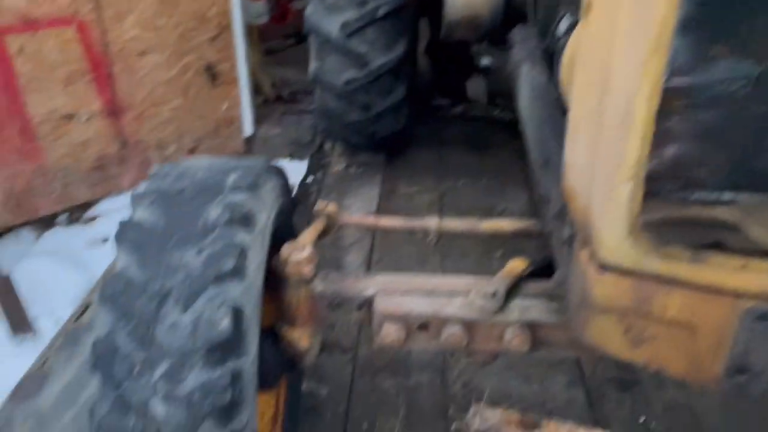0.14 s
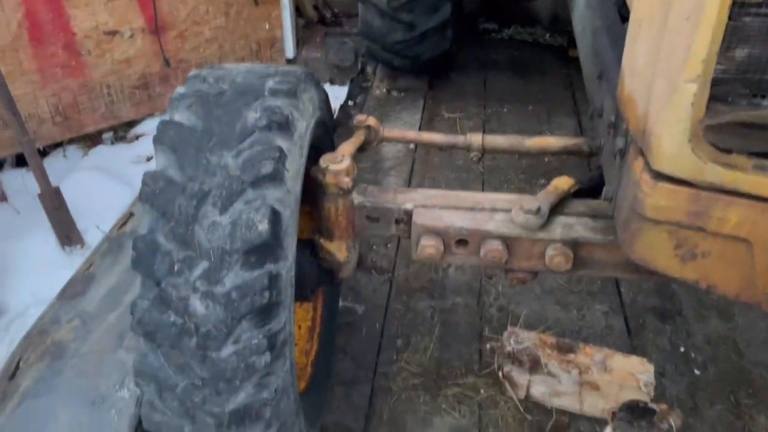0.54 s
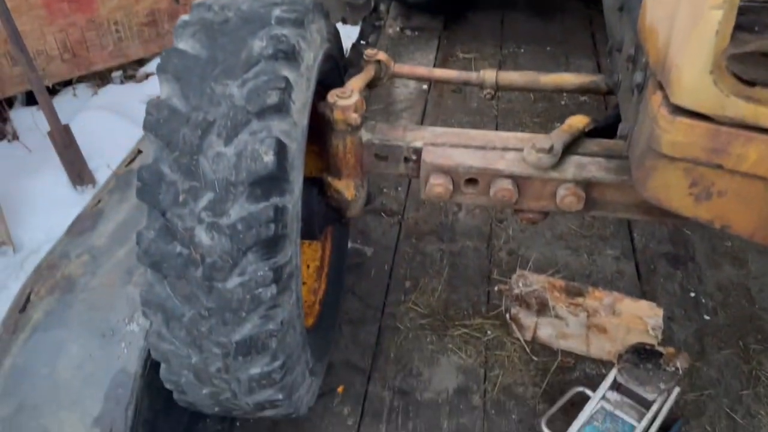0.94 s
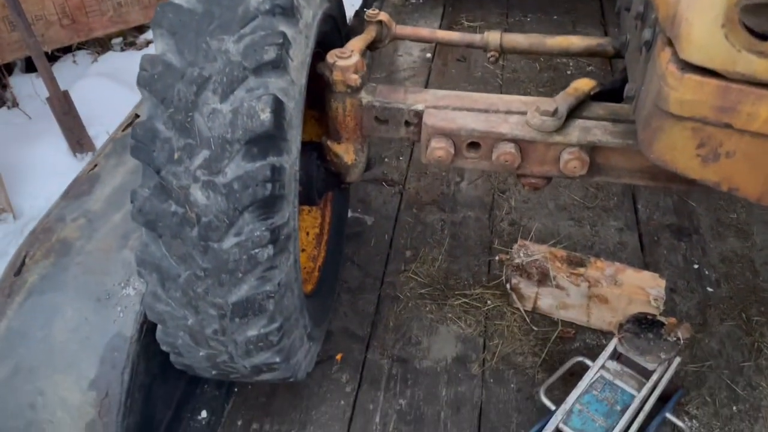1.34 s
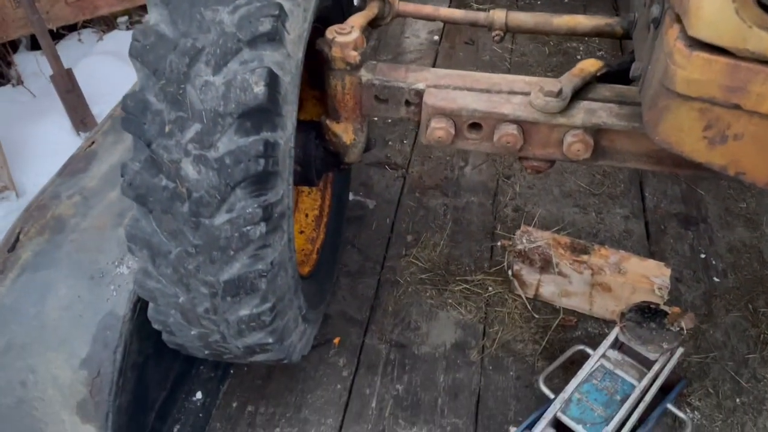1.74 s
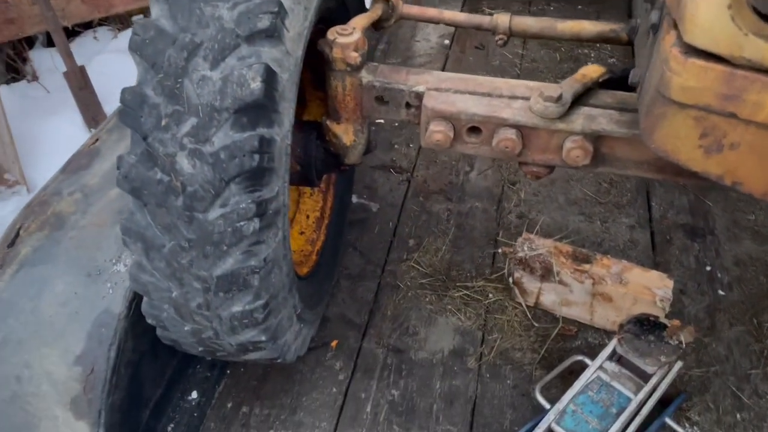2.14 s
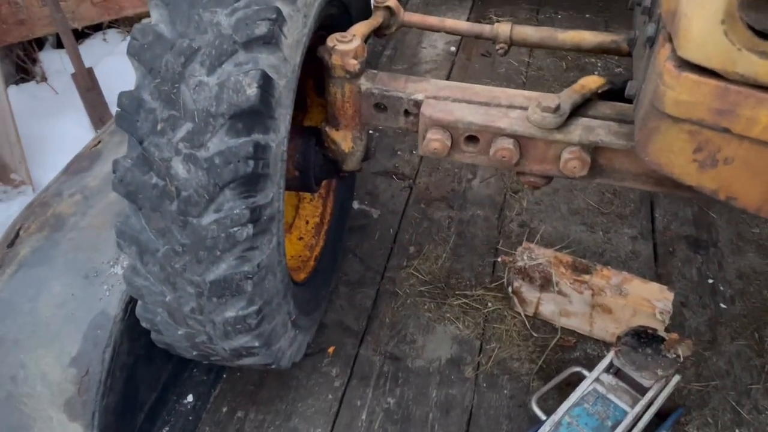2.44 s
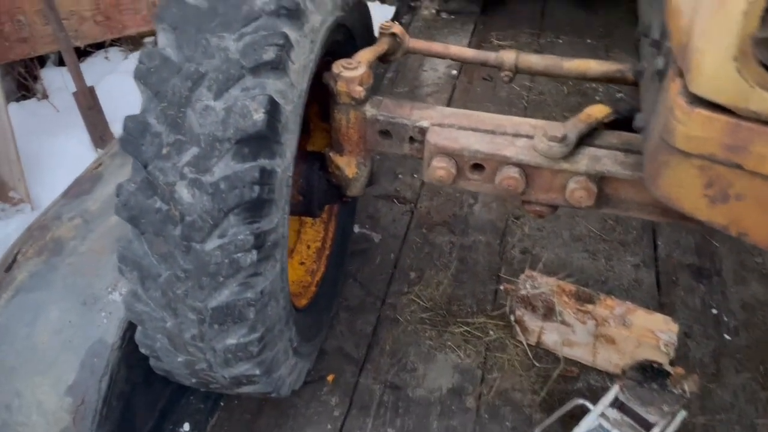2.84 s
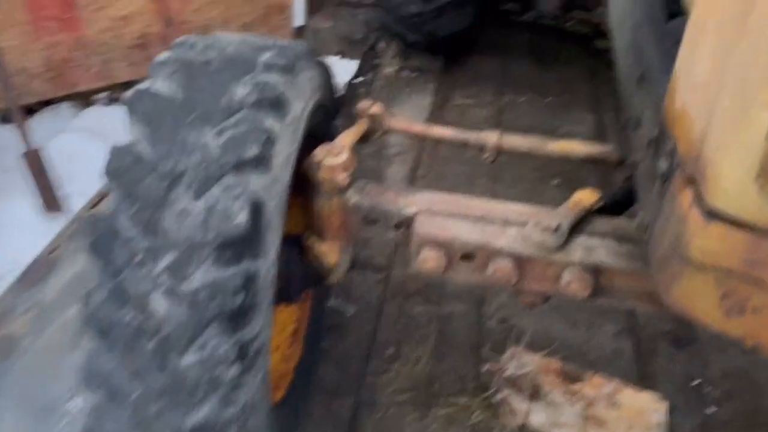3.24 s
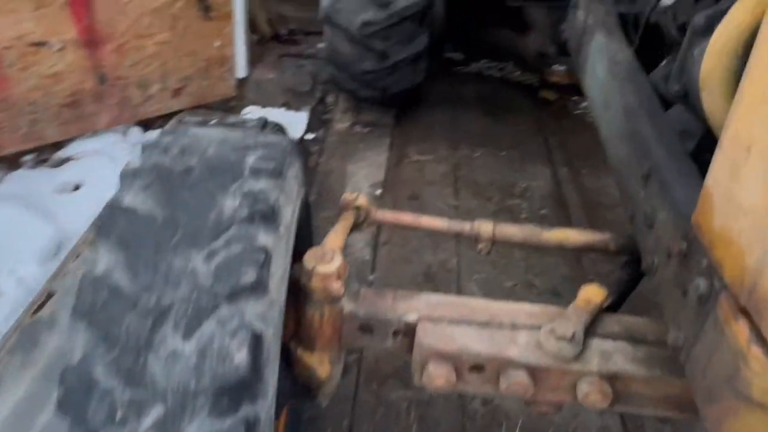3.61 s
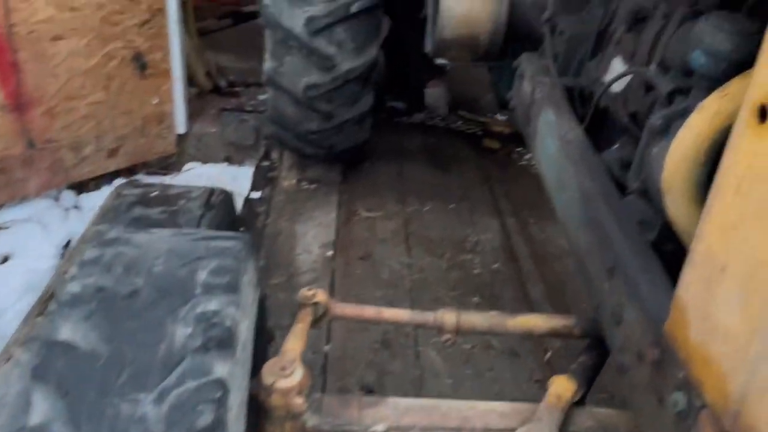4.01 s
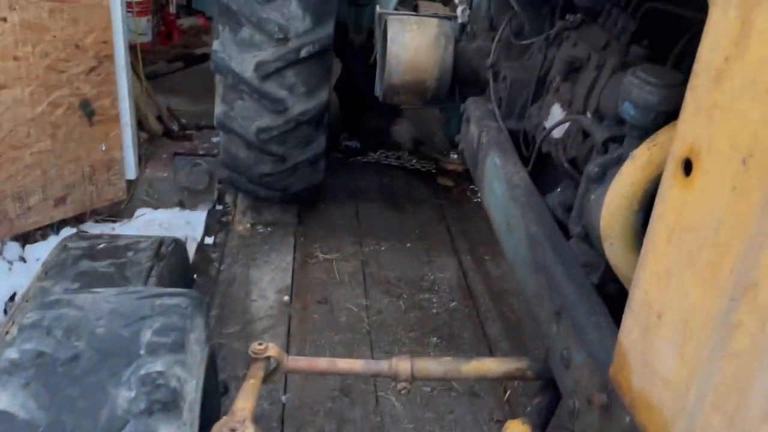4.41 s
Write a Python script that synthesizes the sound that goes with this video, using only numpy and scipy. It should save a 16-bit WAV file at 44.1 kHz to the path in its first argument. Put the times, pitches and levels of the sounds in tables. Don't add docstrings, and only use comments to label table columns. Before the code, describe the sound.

A lever chain hoist under load ratchets in rapid, bright steel clicks with duller knocks, after an opening buffet of wind on the microphone.

```python
import sys
import numpy as np
from scipy import signal
from scipy.fft import rfft, irfft
from scipy.io import wavfile
from scipy.ndimage import uniform_filter1d

SR = 44100
rng = np.random.default_rng(int(sys.argv[2]) if len(sys.argv) > 2 else 0)


def voltage_ratio(level):
    return 10 ** (np.asarray(level, float) / 20)


def unload_audio(sound):
    columns = np.transpose(np.atleast_2d(sound))
    steps = np.round(np.clip(columns, -1, 1) * 32767)
    wavfile.write(sys.argv[1], SR, steps.astype(np.int16))


N = 201316

# time [s], level [dB].
GUST = [(0.0, -37), (0.06, -11.5), (0.1, -21), (0.41, -29.5), (0.51, -23), (0.62, -46.5), (0.75, -32.5),
        (1.07, -50), (1.13, -42.5), (1.8, -50.5), (1.84, -39.5), (2.48, -34.5), (2.73, -42), (2.77, -36),
        (4.3, -41.5), (4.33, -32.5), (4.51, -46.5), (4.56, -22)]
# frequency [Hz], level [dB per Hz].
BUFFET = [(25, -40), (40, -9), (60, -0.5), (110, -4), (200, -7), (400, -24), (800, -76)]
# frequency [Hz], level [dB per Hz].
FLUTTER = [(80, -30), (160, -13), (300, 2.5), (500, -6), (800, -12), (1300, -29.5), (2500, -50)]
# time [s], peak [dB], frequency [Hz].
EDDY_POPS = [(0.013, -5, 335), (0.029, -11, 337), (0.042, -4, 423), (0.059, -4, 97), (0.07, -14.5, 212),
             (0.208, -13, 92), (0.447, -17, 120), (0.647, -26.5, 95), (0.748, -24.5, 495), (0.745, -25, 73),
             (0.813, -25, 96.9), (1.124, -46, 72.7), (1.126, -23.5, 92), (1.22, -26.5, 86),
             (1.489, -27.5, 260), (1.639, -22.5, 330), (1.882, -33, 129), (2.085, -19.5, 136),
             (2.233, -23, 134), (2.436, -15, 210), (2.952, -17, 145), (3.304, -25, 93), (3.549, -36, 196),
             (3.819, -42, 494), (3.821, -21, 181), (4.018, -17.5, 474), (4.237, -27, 156),
             (4.32, -22.5, 73), (4.548, -15.5, 212)]
# frequency [Hz], level [dB per Hz].
AIR = [(180, -33), (300, 13.5), (787, -13), (1970, 0.5), (6620, -15), (8090, -8), (12300, -23.5),
       (16000, -57)]
# start [s], housing level [dB], loudest housing ring [Hz].
BACK = [(0.1157, -22, 2870), (0.169, -24.5, 2070), (0.2108, -23, 3030), (0.8718, -23.5, 1660),
        (0.9369, -27.5, 2620), (0.993, -26.5, 3640), (1.5927, -23, 2400), (1.6416, -23, 2400),
        (1.6964, -23, 2740), (2.2953, -24, 1580), (2.3426, -22, 1990), (2.383, -22, 3130),
        (3.012, -25, 3170), (3.0585, -22.5, 2070), (3.102, -22, 2590), (3.7218, -22.5, 2860),
        (3.77, -21, 1660), (3.8120, -18.5, 2730), (4.4277, -22, 2700), (4.4815, -17.5, 2670),
        (4.524, -14.5, 3470)]
# start [s], housing level [dB], snap level [dB].
TAKE_UP = [(0.3017, -24, -29), (0.377, -29.5, -39.5), (1.139, -41, -53), (1.161, -29, -39.5),
           (1.8464, -34, -40.5), (1.8594, -29.5, -37), (2.5614, -43, -43.5), (2.5696, -34.5, -39),
           (2.5774, -29, -35.5), (3.2472, -37, -51), (3.2761, -30.5, -55), (3.3117, -22, -33.5),
           (3.888, -46, -52), (3.947, -50, -65), (3.9574, -34.5, -66), (3.9659, -31.5, -58),
           (4.0061, -36.5, -42), (4.0137, -19.5, -31), (4.0211, -25.5, -34)]
# start [s], housing level [dB], loudest housing ring [Hz].
LIFT = [(0.4506, -28.5, 2860), (0.4933, -26.5, 2070), (0.5237, -25, 1440), (0.5487, -27.5, 3330),
        (0.577, -27, 2070), (1.228, -28.5, 2470), (1.262, -28, 2070), (1.292, -26.5, 1820),
        (1.3229, -29, 1690), (1.9195, -29, 3130), (1.9549, -27, 3270), (1.9884, -27, 2350),
        (2.018, -26.5, 2260), (2.6338, -28, 2140), (2.6743, -28.5, 2240), (2.7063, -27, 2280),
        (2.7374, -28, 2280), (3.3601, -22, 2020), (3.3954, -24.5, 3070), (3.4351, -22.5, 2140),
        (3.465, -24, 3160), (4.0676, -24, 2070), (4.1081, -21.5, 2850), (4.1435, -21.5, 2800),
        (4.1778, -21, 3410)]
# start [s], housing level [dB], loudest housing ring [Hz].
HOLD = [
    (0.624, -29.5, 3120),
    (1.3691, -26.5, 3280),
    (2.0605, -28, 2360),
    (2.7794, -29, 2100),
    (3.5032, -23.5, 3100),
    (4.2382, -25.5, 1870),
]
# start [s], housing level [dB].
SLACK = [(0.7575, -47), (0.7629, -28.5), (0.8095, -37), (1.483, -38), (1.4938, -29), (2.1803, -41.5),
         (2.2, -44), (2.269, -57), (2.917, -34.5), (2.9506, -40), (3.6134, -34.5), (3.6356, -33.5),
         (3.6532, -39), (4.3205, -33.5), (4.3644, -37.5), (4.401, -50)]
# start [s], peak [dB].
STOP_KNOCKS = [
    (0.45, -17),
    (0.762, -37),
    (1.162, -36.5),
    (2.581, -33),
    (3.309, -28.5),
    (4.018, -32),
]
# frequency [Hz], width [Hz], level [dB].
PAWL_MODES = [(4855, 590, 5), (5500, 700, 9.5), (6740, 520, 8.5), (7455, 380, 14), (8280, 1400, -1.5),
              (8870, 430, 15.5), (9440, 470, 2), (11460, 560, 6), (12040, 120, 8), (14200, 1300, -1.5),
              (14800, 510, -13)]
# frequency [Hz], width [Hz], level [dB].
HOUSING_MODES = [(1065, 345, -11), (1405, 81, 1.5), (1660, 27, -7), (2070, 132, 5), (2367, 210, -10),
                 (2615, 150, 3.5), (2863, 330, -3), (3420, 293, 0.5), (3526, 530, -2)]
# frequency [Hz], width [Hz], level [dB].
STOP_MODES = [(200, 140, 4), (323, 78, 1), (510, 450, -1), (716, 150, 2.5), (970, 60, -34)]
# frequency [Hz], width [Hz], level [dB].
FRAME_MODES = [(356, 93, 6), (410, 96, 3), (573, 230, -7), (712, 24, -2), (747, 190, -12)]
# frequency [Hz], time to fall 60 dB [s].
SHED_T60 = [(700, 0.4), (2000, 0.26), (5000, 0.29), (10000, 0.18), (16000, 0.19)]
# frequency [Hz], shared share [0 to 1].
LIKENESS = [(500, 0.72), (3000, 0.49), (6000, 0.58), (7700, 0.96), (8700, 0.87), (10000, 0.88), (11500, 1),
            (14500, 0.8)]
# frequency [Hz], left minus right level [dB].
LEFT_BIAS = [(60, 0.5), (130, -6), (290, 1.5), (640, 0.5), (1410, 2.5), (3100, 4.5), (6820, 0.5),
             (15000, -0.5)]
# frequency [Hz], phase [half turns].
RIGHT_LEAD = [(5500, 0), (7900, .98), (8600, 1.03), (11200, 2), (11800, 2.03), (14300, 2.98), (16000, 3.04)]


def rms_one(x):
    return x / np.sqrt(np.mean(x ** 2, axis=-1, keepdims=True) + 1e-20)


def at_hz(points, hz):
    table_hz, value = np.transpose(points)
    return np.interp(np.log(hz + 1), np.log(table_hz), value)


def band_pass(x, low_hz, high_hz):
    return signal.sosfilt(signal.butter(2, [low_hz, high_hz], "band", fs=SR, output="sos"), x)


def coloured(spectrum, channels):
    hz = np.fft.rfftfreq(N, 1 / SR)
    white = rng.standard_normal((channels, N))
    return rms_one(irfft(rfft(white) * voltage_ratio(at_hz(spectrum, hz)), N))


def drift(rate_hz):
    slow = signal.butter(2, rate_hz, fs=SR, output="sos")
    return rms_one(signal.sosfilt(slow, rng.standard_normal(N)))


def wind():
    t = np.arange(N) / SR
    lumps = np.clip(drift(27.8), -3, 1.3)
    gust_db = np.interp(t, *np.transpose(GUST))
    gust_flutter_db = -47.5 + 1.14 * (gust_db + 39.5)
    swing_db = -13 - 51 * t
    flutter_db = np.maximum(gust_flutter_db, swing_db)
    out = 0
    for spectrum, level_db, lumpy_db, side_db in ((BUFFET, gust_db - 1.5, 2.5, -13),
                                                  (FLUTTER, flutter_db - 7.5, 6.5, -9)):
        mid, side = coloured(spectrum, channels=2) * voltage_ratio(level_db + lumpy_db * lumps)
        out = out + mid + voltage_ratio(side_db) * side * np.array([[1], [-1]])
    return out


def eddy_pops():
    out = np.zeros(N)
    for s, peak_db, hz in EDDY_POPS:
        t = np.maximum(np.arange(N) / SR - s + 0.00296, 0)
        out += voltage_ratio(peak_db - 5.5) * np.sin(2 * np.pi * hz * t) * np.exp(-t * hz / 2.0)
    return band_pass(out, 45, 1100)


def still_air():
    return voltage_ratio(-52.5) * coloured(AIR, channels=2)


def contacts():
    link_ring_hz, take_up_rise_ms = 2400, 1.35
    rise_lost_per_db = 0.025
    rows = [(s, db, snap_db, take_up_rise_ms, link_ring_hz) for s, db, snap_db in TAKE_UP]
    slack = [(s, db, link_ring_hz) for s, db in SLACK]
    # table, base snap dB, share of the knock's excess passed to the snap, rise ms, brightening dB per s
    laws = ((LIFT, -21, 0.36, 1.25, 0),
            (HOLD, -22, 0.047, 2.4, 0),
            (slack, -33, 1, 2.4, 0),
            (BACK, -26.5, 0.2, 2.7, 1.08))
    for table, base_db, share, base_rise_ms, brightens in laws:
        for s, db, hz in table:
            snap_db = base_db + share * (db + 22.5) + brightens * (s - 2)
            rise_ms = base_rise_ms * np.exp(-rise_lost_per_db * (db + 25))
            rows.append((s, db, snap_db, rise_ms, hz))
    return np.transpose(sorted(rows))


def facing_crack_db(s):
    turn_s, turn_takes_s = 3.26, 0.15
    return 14 * np.clip((s - turn_s) / turn_takes_s, 0, 1)[:, None]


def strikes(times, levels_db, rise_ms, loudest_hz, modes, t60, crack_db, focus_db, rattle_db, broad_db):
    t = np.arange(4000) / SR
    draw = rng.standard_normal((len(times), 3, len(t)))
    rise = np.maximum(rise_ms, 0.1)[:, None] / 1000
    decay = voltage_ratio(-60 * t / t60) + voltage_ratio(crack_db - 60 * t / 0.043)
    envelope = (1 - np.exp(-t / rise)) ** 2 * decay
    uneven = voltage_ratio(rattle_db * rms_one(uniform_filter1d(draw[:, 2], size=50)))
    rattle = draw[:, :2] * (envelope * uneven)[:, None]
    strength_db = 3.0 * np.clip(rng.standard_normal((len(times), 16)), -1.6, 1.6)
    rung = voltage_ratio(broad_db) * band_pass(rattle, modes[0][0], min(modes[-1][0], 0.45 * SR))
    for k, (hz, width_hz, db) in enumerate(modes):
        r = np.exp(-np.pi * width_hz / SR)
        ring = signal.lfilter([1, 0, -1], [1, -2 * r * np.cos(2 * np.pi * hz / SR), r * r], rattle)
        near = np.exp(-(np.log(hz / loudest_hz) / 0.069) ** 2)
        gain = voltage_ratio(db + strength_db[:, k] + focus_db * near)[:, None, None]
        rung += ring * (1 - r * r) / 2 * (-1) ** k * gain
    out = np.zeros((2, N + len(t)))
    for s, db, blow in zip(times, levels_db, rms_one(rung)):
        start = round(s * SR)
        out[:, start:start + len(t)] += voltage_ratio(db) * blow
    return out[:, :N]


def pawl_snap(s, snap_db, rise_ms, loudest_hz):
    return strikes(s - 0.0012, snap_db - 8, rise_ms / 3, loudest_hz, PAWL_MODES, t60=0.082,
                   crack_db=-4.5 + facing_crack_db(s), focus_db=0, rattle_db=2.0, broad_db=3.5)


def housing_knock(s, housing_db, rise_ms, loudest_hz):
    return strikes(s - 0.0012, housing_db - 11, rise_ms, loudest_hz, HOUSING_MODES, t60=0.13,
                   crack_db=-7 + facing_crack_db(s), focus_db=7, rattle_db=1.5, broad_db=-3.5)


def frame_answer(s, housing_db, rise_ms):
    return strikes(s, housing_db - 27.5, rise_ms + 1.0, 500, FRAME_MODES, t60=0.16,
                   crack_db=-12, focus_db=6, rattle_db=2.5, broad_db=4)


def lever_stop():
    s, peak_db = np.transpose(STOP_KNOCKS)
    return strikes(s - 0.002, peak_db - 11.5, 0 * s + 1.0, 490, STOP_MODES, t60=0.046,
                   crack_db=14, focus_db=-21, rattle_db=8.5, broad_db=-2.0)


def hoist():
    s, housing_db, snap_db, rise_ms, loudest_hz = contacts()
    snap = pawl_snap(s, snap_db, rise_ms, loudest_hz)
    knock = housing_knock(s, housing_db, rise_ms, loudest_hz)
    return snap + knock + lever_stop() + frame_answer(s, housing_db, rise_ms)


def shed(x, wet_db):
    t = np.arange(24000) / SR
    white = rng.standard_normal((2, len(t)))
    edges = np.geomspace(250, 18000, 9)
    tail = 0
    for low, high in zip(edges, edges[1:]):
        t60 = at_hz(SHED_T60, np.sqrt(low * high))
        tail = tail + band_pass(white, low, high) * voltage_ratio(-60 * t / t60)
    tail = tail * np.clip((t - 0.004) / 0.0056, 0, 1)
    tail = tail / np.sqrt(np.sum(tail ** 2, axis=1, keepdims=True))
    return x + voltage_ratio(wet_db) * signal.fftconvolve(x, tail, axes=1)[:, :N]


def ports(x):
    hz = np.fft.rfftfreq(N, 1 / SR)
    shared, own = rfft(x)
    alike = np.clip(at_hz(LIKENESS, hz), 0, 1)
    common = np.sqrt((1 + alike) / 2) * shared
    apart = np.sqrt((1 - alike) / 2) * own
    lead = np.exp(1j * np.pi * np.interp(hz, *np.transpose(RIGHT_LEAD)))
    bias = voltage_ratio(at_hz(LEFT_BIAS, hz) / 2)
    return irfft([(common + apart) * bias, (common - apart) * lead / bias], N)


def scene():
    on_ports = wind() + eddy_pops()
    air = still_air()
    return ports(shed(hoist(), wet_db=-12.5) + air) + on_ports


def low_pass(x):
    return signal.sosfilt(signal.butter(12, 16480, fs=SR, output="sos"), x)


def record(dry):
    top_cut = signal.cheby2(10, 60, 16600, fs=SR, output="sos")
    mix = signal.sosfilt(top_cut, dry)
    return low_pass(mix)


dry = scene()
out = record(dry)
unload_audio(out)
```